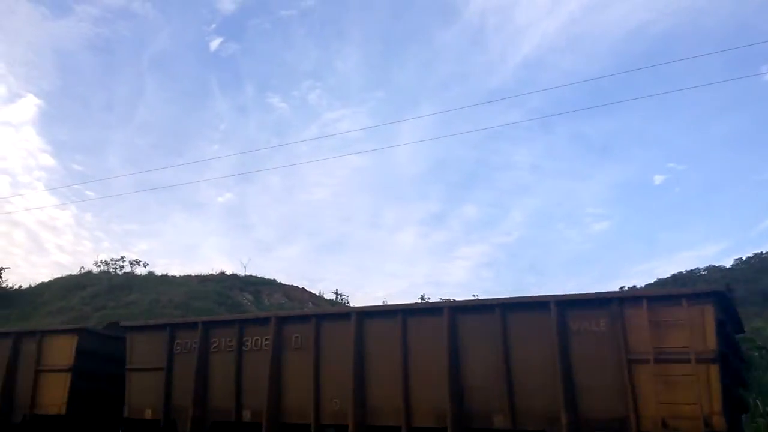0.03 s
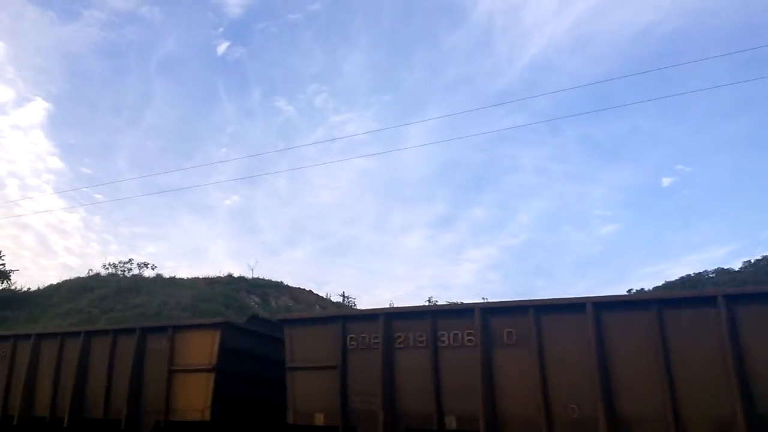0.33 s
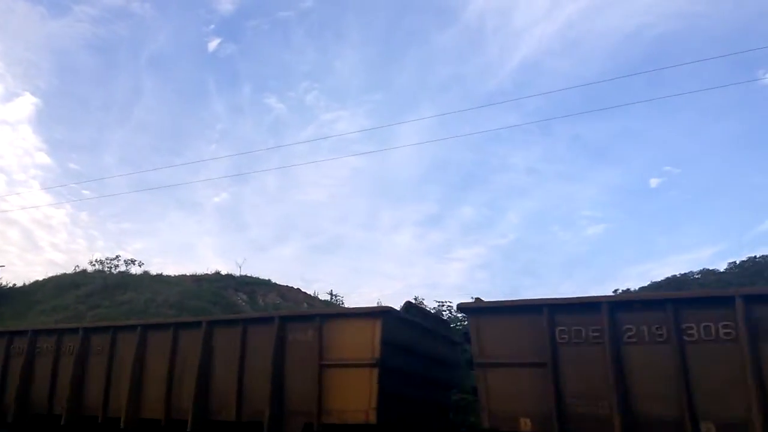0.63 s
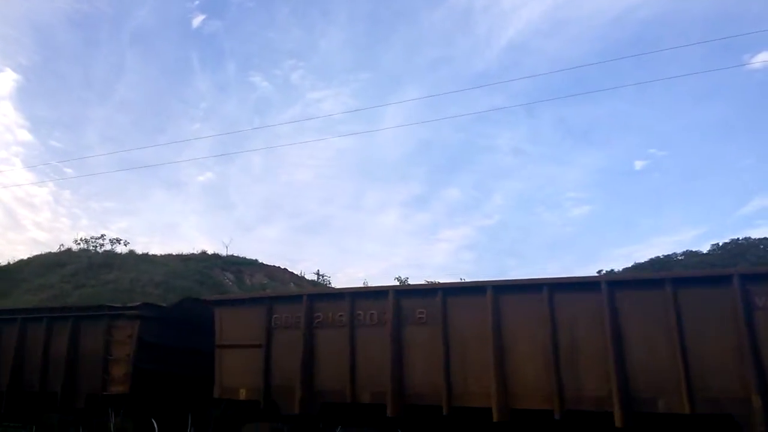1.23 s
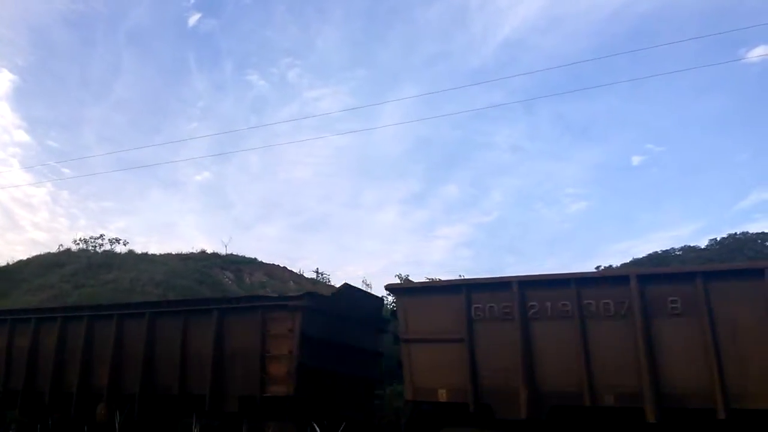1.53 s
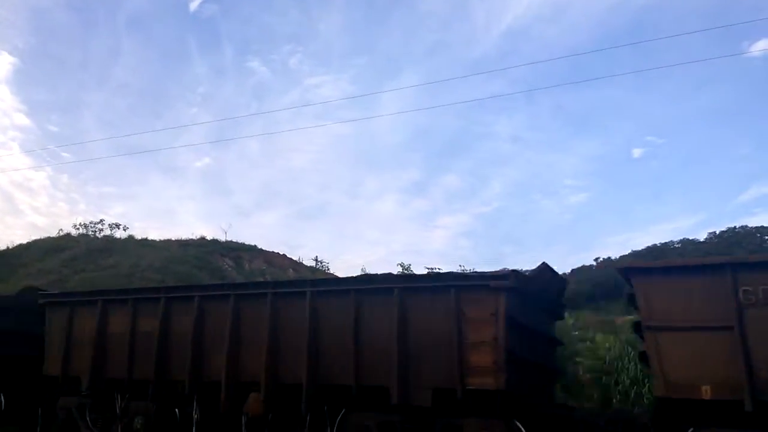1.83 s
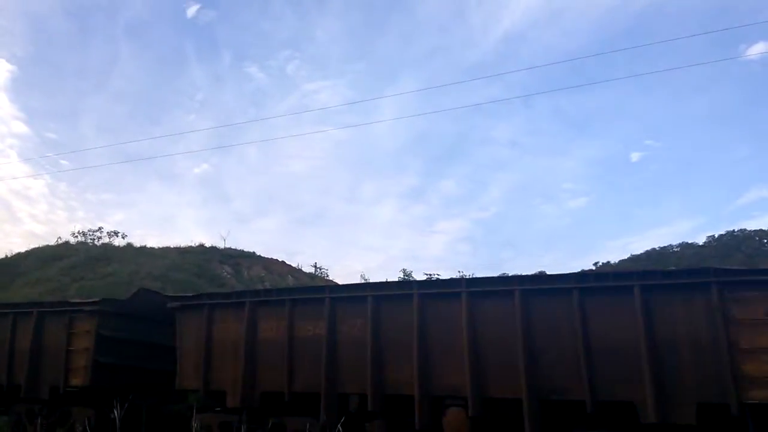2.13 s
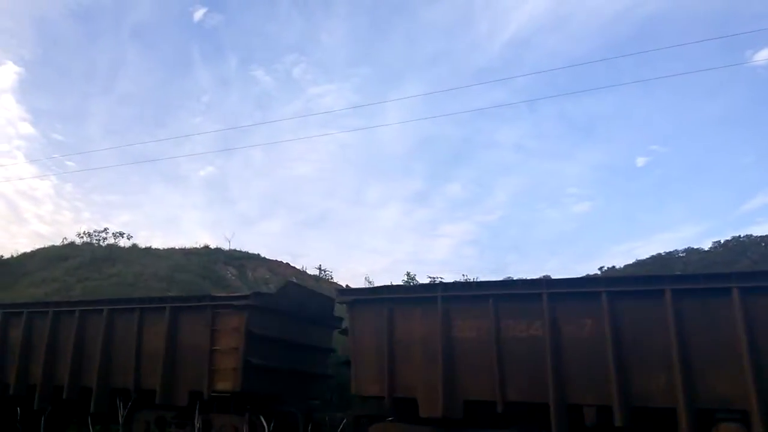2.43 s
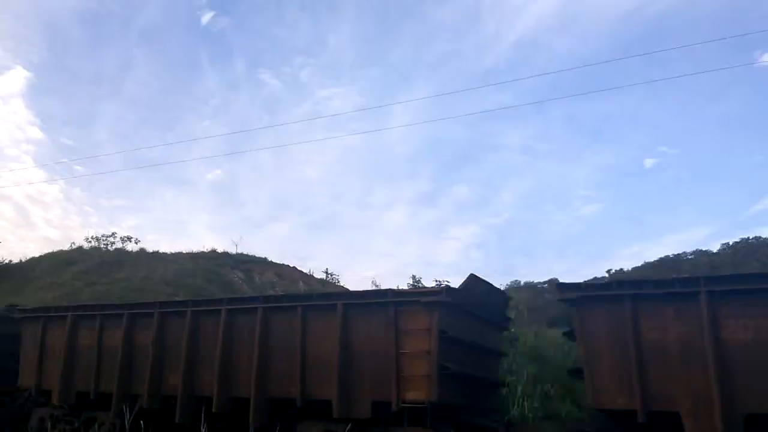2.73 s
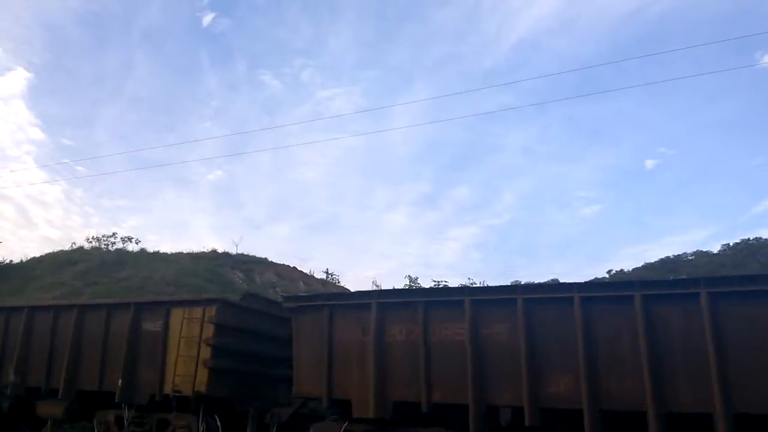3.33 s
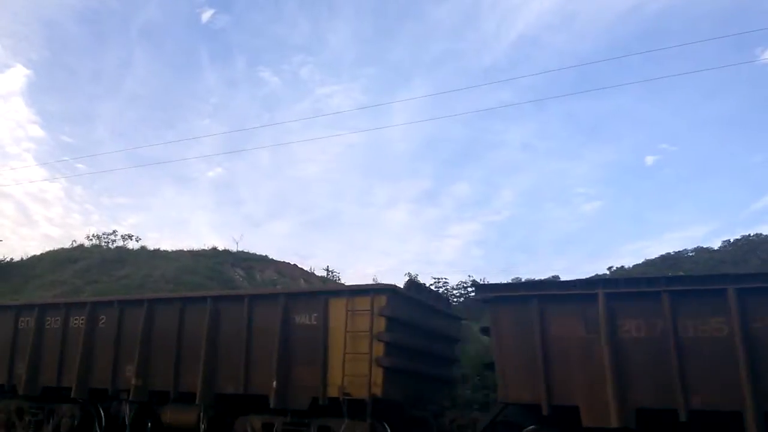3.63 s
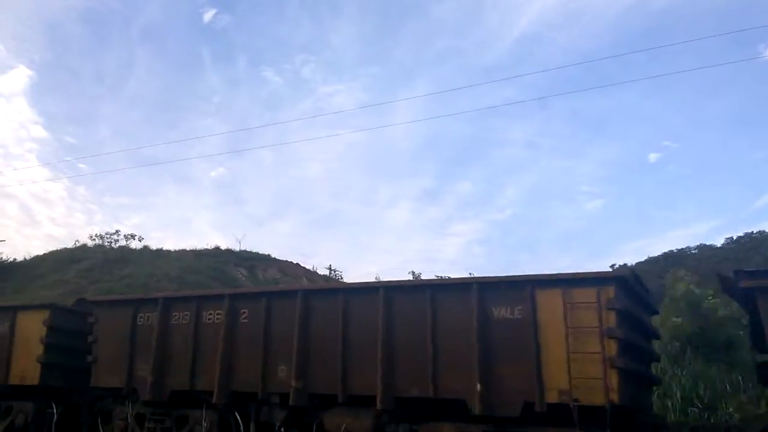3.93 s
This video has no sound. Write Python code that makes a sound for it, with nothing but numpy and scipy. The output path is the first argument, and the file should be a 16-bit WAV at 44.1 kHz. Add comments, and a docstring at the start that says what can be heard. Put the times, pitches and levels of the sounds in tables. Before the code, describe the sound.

A freight train rolls past several metres away, rumbling and roaring throughout and easing slightly by 4 seconds. Wheels knock over a rail joint in pairs about every half second. Low wagon booms come between 0.5 and 2.5 seconds, with faint metal swishes and a few clinks scattered along. A thin, very high wheel squeal flutters from the start, swells after 2 seconds and peaks near 3.

```python
"""Freight train passing

Open wagons roll by at about 35 km/h, some nine metres away in open country. Bodies rumble and boom,
wheels and rails roar and ring, and each pair of axles knocks over a rail joint. Two wheels squeal
very high and drop in pitch as they pass; flanges brush the rail and loose fittings clink."""
import sys
import numpy as np
from scipy import signal
from scipy.fft import irfft
from scipy.io import wavfile
from scipy.ndimage import uniform_filter1d

SR = 44100
rng = np.random.default_rng(int(sys.argv[2]) if len(sys.argv) > 2 else 0)


def to_wav(s):
    """Save 16-bit WAV."""
    ch = np.atleast_2d(s).T  # columns
    pcm = np.round(np.clip(ch, -1, 1) * 32767)  # PCM
    wavfile.write(sys.argv[1], SR, pcm.astype(np.int16))


N = 176400
TIME_S = np.arange(N) / SR
FREQ_HZ = np.fft.rfftfreq(N, 1 / SR)
SPEED_M_PER_S, DISTANCE_M, SOUND_M_PER_S = 9.747, 9.356, 343


def amp(db):
    """Decibels to gain."""
    return 10 ** (np.asarray(db) / 20)


def unit(x):
    """Scale to rms 1."""
    return x / np.sqrt(np.mean(abs(x) ** 2) + 1e-20)


def level(points):
    """Gain over time from rows of time_s, level_db."""
    return amp(np.interp(TIME_S, *np.transpose(points)))


def colour(points):
    """Spectrum in dB from rows of freq_hz, level_db."""
    hz, db = np.transpose(points)
    return np.interp(np.log(FREQ_HZ + 1), np.log(hz + 1), db)


def noise(spectrum_db):
    """Noise of rms 1 with the given spectral shape."""
    phases = np.exp(2j * np.pi * rng.random(len(FREQ_HZ)))
    return unit(irfft(amp(spectrum_db) * phases, N))


def drift(rate_hz):
    """Random motion of rms 1, mostly below rate_hz."""
    return noise(-10 * np.log10(1 + (FREQ_HZ / rate_hz) ** 4))


def band(pitch_hz, half_width_hz):
    """Noise in one resonance."""
    return noise(-20 * np.log10(1 + ((FREQ_HZ - pitch_hz) / half_width_hz) ** 2))


def blow(start_s, decay_s, attack_s=.004, hold_s=.014):
    """Envelope of one impact."""
    age_s = TIME_S - start_s
    return np.clip(age_s / attack_s, 0, 1) * np.exp(-np.maximum(age_s - attack_s - hold_s, 0) / decay_s)


def doppler(passing_s):
    """Heard over emitted pitch for a wheel moving along the track."""
    along_m = SPEED_M_PER_S * (TIME_S - passing_s)
    return 1 / (1 + SPEED_M_PER_S / SOUND_M_PER_S * along_m / np.hypot(along_m, DISTANCE_M))


def steel_db():
    """Spectral lift from wheel and rail resonances."""
    # pitch_hz, width_hz, lift_db
    resonances = [(337, 53, 5), (506, 24, 3), (601, 91, 7), (872, 54, 6.5), (1040, 42, 1), (1347, 120, 4),
                  (1582, 23, 3.5), (1910, 170, 2), (2293, 196, 5), (3720, 63, -2.5)]
    return sum(db / (1 + (2 * (FREQ_HZ - hz) / width_hz) ** 2) for hz, width_hz, db in resonances)


def uneven_treads(x, depth_db=1.82, patch_hz=130, patch_s=.1):
    """Uneven wheel treads make short patches of the spectrum swell and fade."""
    spectrogram = signal.stft(x, nperseg=1024)[2]
    patches = rng.standard_normal(spectrogram.shape)
    for axis, cells in enumerate([patch_hz * 1024 / SR, patch_s * SR / 512]):
        patches = uniform_filter1d(patches, round(cells), axis)
    return unit(signal.istft(spectrogram * amp(depth_db * unit(patches)))[1][:N])


def rolling(surge_db=.6, surge_hz=7.4):
    """Wagon bodies rumble; the roar of wheels and rails and the hiss of their contact surge together."""
    # spectra: freq_hz, density_db
    rumble_spectrum = [(12, -18), (24, -8.5), (34, -4), (48, -1), (60, 2), (72, -1), (90, -3), (125, -8),
                       (175, -12), (230, -42.5), (500, -61)]
    roar_spectrum = [(100, -15.5), (220, 5), (300, -0.5), (430, -2.5), (520, 0), (700, -6), (800, -10),
                     (1000, -4.5), (1200, -11.5), (1700, -11), (2100, -16.5), (2600, -26), (4000, -37.5),
                     (9000, -63)]
    hiss_spectrum = [(1000, -21), (2100, -16.5), (2400, 3), (3200, 2), (3600, 0.5), (4600, -2.5),
                     (6000, -9), (8000, -16), (10000, -20.5), (16000, -15)]
    # envelopes: time_s, level_db
    rumble_levels = [(0, -27.5), (.5, -27.5), (.9, -26.5), (1.7, -27.5), (2.1, -28), (2.5, -28), (3.2, -29),
                     (4, -30.5)]
    roar_levels = [(0, -34.5), (.5, -34.5), (.85, -35), (1.25, -34.5), (1.5, -36), (1.7, -36), (2.4, -38.5),
                   (2.9, -39.5), (3.35, -39), (3.6, -39), (4, -38.5)]
    hiss_levels = [(0, -42.5), (.45, -45), (1.2, -45.5), (1.5, -46.5), (1.75, -47), (1.92, -48.5),
                   (2.1, -45.5), (2.45, -48.5), (2.7, -47.5), (2.92, -50.5), (3.1, -49), (3.4, -52),
                   (3.65, -49), (4, -51.5)]
    rumble = level(rumble_levels) * noise(colour(rumble_spectrum))
    roar = level(roar_levels) * uneven_treads(noise(colour(roar_spectrum) + steel_db()))
    hiss = level(hiss_levels) * uneven_treads(noise(colour(hiss_spectrum) + steel_db()))
    return rumble + (roar + hiss) * amp(surge_db * drift(surge_hz))


def wheel_ringing(tuning=.96):
    """Rolling keeps each wheelset ringing; it swells and drops in pitch as it passes."""
    # passing_s, level_db
    wheelsets = [(.4, -49), (1.45, -56.5), (2.35, -59.5), (3.25, -51)]
    # pitch, half_width (each times tuning gives Hz), level_db
    modes = [(1378, 17, -3), (1568, 13, -6.5), (2349, 34, -1), (2530, 20, -7), (3050, 11, -1),
             (3237, 67, -2.5), (4227, 9.2, -9), (4936, 21, -7)]
    power = sum(amp(db) ** 2 / half_width / (1 + ((FREQ_HZ - pitch) / half_width) ** 2) ** 2
                for pitch, half_width, db in modes)
    out = np.zeros(N)
    for passing_s, db in wheelsets:
        ring = noise(10 * np.log10(power))
        nearness = DISTANCE_M / np.hypot(SPEED_M_PER_S * (TIME_S - passing_s), DISTANCE_M)
        read_index = np.cumsum(tuning * doppler(passing_s)) % N
        out += amp(db) * nearness * np.interp(read_index, np.arange(N), ring)
    return out


def rail_joint():
    """Each axle drops on the joint: the bogie thumps and the wheel clacks."""
    # start_s, thump_db, clack_db, clack_tilt_db_per_octave
    axles = [(0, -24.5, -27.5, -2), (0.176, -33, -31, 2.5), (0.569, -31.5, -32, -0.5),
             (0.747, -37, -28, -3), (0.995, -23, -32, -1.5), (1.172, -29, -26, -2),
             (1.562, -32, -32.5, -0.5), (1.728, -36, -30, 0), (1.991, -24, -30, 0), (2.172, -31, -30, -2.5),
             (2.554, -27.5, -32.5, 3), (2.735, -36, -33.5, -1.5), (2.989, -24.5, -38, 2),
             (3.168, -29, -33.5, 0), (3.552, -26.5, -37.5, 3), (3.733, -35, -33.5, -2.5),
             (3.987, -28, -46, 5)]
    # freq_hz, density_db
    thump_spectrum = [(40, 3), (90, 6), (135, -21), (170, 12), (240, -27), (340, -3), (450, -22),
                      (700, -38), (2000, -48)]
    clack_spectrum = [(150, 9), (350, -2.5), (520, 3.5), (750, -3), (1000, 2), (1300, -5.5), (1900, -8),
                      (2500, -7), (3500, -12), (5000, -20), (8000, -32), (14000, -56)]
    octaves = np.log2(1 + FREQ_HZ / 1000)  # tilt acts mainly above 1 kHz
    clack_shape_db = colour(clack_spectrum) + .96 * steel_db()
    thump_envelope, clacks = np.zeros((2, N))
    for start_s, thump_db, clack_db, tilt in axles:
        thump_envelope += amp(thump_db) * blow(start_s, decay_s=.025)
        clacks += amp(clack_db) * blow(start_s, decay_s=.031) * noise(clack_shape_db + tilt * octaves)
    return thump_envelope * noise(colour(thump_spectrum) + steel_db()) + clacks


def squeal_tone(pitch_hz, levels, waver_hz=6, echo_share=.36, flutter_hz=18):
    """A squealing wheel mode wavers slightly; echoes off the wagons make it flutter and drop out."""
    cycles = np.cumsum(pitch_hz + waver_hz * drift(rate_hz=40)) / SR
    paths = 1 + echo_share * (drift(flutter_hz) + 1j * drift(flutter_hz))
    return level(levels) * unit((paths * np.exp(2j * np.pi * cycles)).real)


def wheel_squeal(follow_share=.25, flicker_db=.26):
    """Two passing wheels and a steady tone; the wagons scatter their squeal into a narrow hiss."""
    # passing_s, rest_pitch_hz
    wheels = [(.475, 14669), (3.229, 14692)]
    # envelopes: time_s, level_db
    first_levels = [(0, -43), (.22, -43), (.32, -32), (.45, -41), (.65, -32), (.78, -39), (.9, -32),
                    (1.2, -38), (1.57, -33), (1.72, -48), (4, -65)]
    second_levels = [(0, -44), (.8, -45), (1.05, -36), (1.27, -43), (1.4, -34), (1.58, -31), (1.72, -37),
                     (2.17, -24), (2.24, -34), (2.3, -24), (2.38, -33), (2.62, -20.5), (2.73, -26),
                     (2.84, -21), (2.91, -27), (2.96, -19), (3.04, -23), (3.09, -15.5), (3.18, -36),
                     (3.3, -34), (3.38, -20), (3.44, -30), (3.53, -24), (3.66, -35), (4, -29)]
    steady_levels = [(0, -37), (.22, -38), (.33, -28), (.52, -38), (.9, -29), (1.13, -39), (1.42, -29),
                     (1.55, -39), (1.73, -32), (1.9, -41), (2.6, -36), (3.2, -46), (4, -50)]
    scatter_levels = [(0, -40), (.7, -37.5), (1.8, -36.5), (2.3, -30.5), (2.7, -27.5), (3, -29),
                      (3.25, -34), (3.6, -31), (4, -32)]
    # scatter spectrum: freq_hz and matching density_db
    scatter_hz = [11500, 12700, 13600, 13820, 14250, 14400, 14720, 15000, 15200, 15700]
    scatter_db = [-43, -35, -31, -19, -14, -5, 0, -5, -13, -19]
    first_hz, second_hz = (hz * doppler(passing_s) for passing_s, hz in wheels)
    # the hiss leans with the louder wheel's pitch
    centre_hz = np.average([first_hz, second_hz], 0, weights=[level(first_levels), level(second_levels)])
    shift_cycles = np.cumsum(follow_share * (centre_hz - wheels[1][1])) / SR
    hiss = noise(np.interp(FREQ_HZ, scatter_hz, scatter_db, left=-100))
    scatter = (signal.hilbert(hiss) * np.exp(2j * np.pi * shift_cycles)).real
    tones = squeal_tone(first_hz, first_levels) + squeal_tone(second_hz, second_levels)
    tones += squeal_tone(pitch_hz=14753, levels=steady_levels)
    return tones + level(scatter_levels) * amp(flicker_db * drift(rate_hz=7.8)) * scatter


def body_booms():
    """Jolts set the wagon bodies booming on their springs."""
    # start_s, level_db
    jolts = [(.56, -18.5), (0.798, -25), (1.151, -26.5), (1.701, -22), (2.3, -22.5), (2.54, -24)]
    envelope = sum(amp(db) * blow(start_s, decay_s=.033) for start_s, db in jolts)
    return envelope * band(pitch_hz=59.4, half_width_hz=8.8)


def flange_brushes(relative_width=.26, rolloff_hz_per_db=1200, grain_db=.5):
    """Short grainy swishes as a flange touches the rail."""
    # peak_s, length_s, level_db, centre_hz
    brushes = [(0.648, 0.076, -53, 5960), (0.81, 0.095, -42, 2660), (1.25, 0.078, -52, 4940),
               (1.62, 0.088, -51.5, 5000), (1.648, 0.084, -41.5, 2270), (3.06, 0.062, -51.5, 4800),
               (3.624, 0.079, -52, 4000)]
    swishes = np.zeros(N)
    for peak_s, length_s, db, centre_hz in brushes:
        envelope = np.exp(-(2 * (TIME_S - peak_s) / length_s) ** 2)
        band_db = -10 * np.log10(1 + ((FREQ_HZ / centre_hz - 1) / relative_width) ** 2)
        swishes += amp(db) * envelope * noise(band_db - FREQ_HZ / rolloff_hz_per_db)
    return swishes * amp(grain_db * drift(rate_hz=140))


def loose_fittings():
    """Loose metal parts rattle briefly in one resonance each."""
    # start_s, pitch_hz, half_width_hz, level_db, decay_s
    clinks = [(1.809, 3500, 190, -45.5, .008), (1.809, 5300, 280, -48, .008), (2.066, 1335, 110, -35, .008),
              (2.785, 3130, 70, -47.5, .04)]
    return sum(amp(db) * blow(start_s, decay_s) * band(hz, half_width_hz)
               for start_s, hz, half_width_hz, db, decay_s in clinks)


def scene():
    """The whole train, in mono."""
    train = rolling() + wheel_ringing() + rail_joint() + wheel_squeal()
    return (train + body_booms() + flange_brushes() + loose_fittings())[None]


def record(dry):
    """Steep low-pass just above the squeal."""
    cutoff_hz = 15740
    lowpass = signal.firwin(1201, cutoff_hz, window=("kaiser", 9), fs=SR)
    return signal.oaconvolve(dry, lowpass[None], "same")


dry = scene()
out = record(dry)
to_wav(out)
```